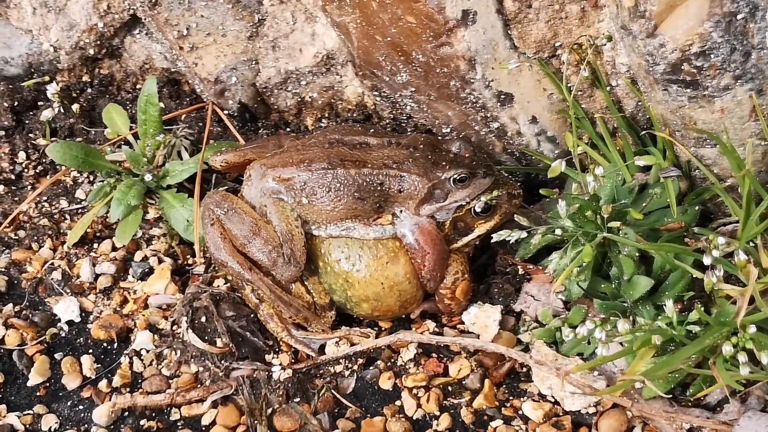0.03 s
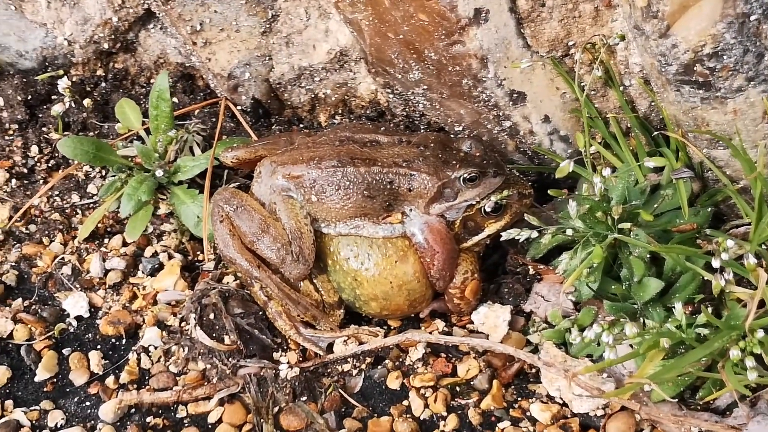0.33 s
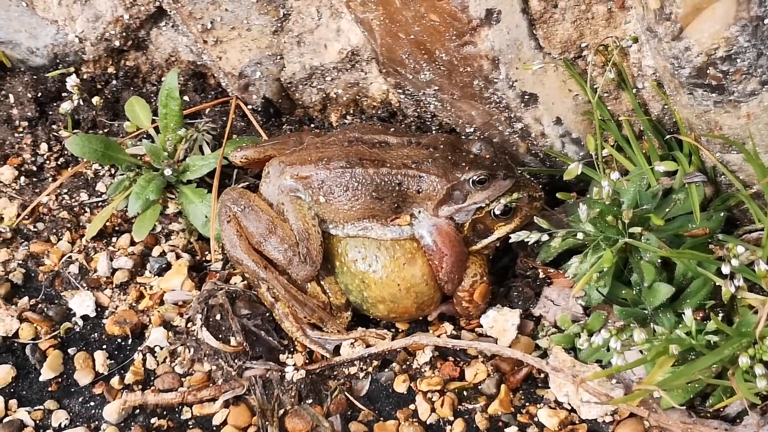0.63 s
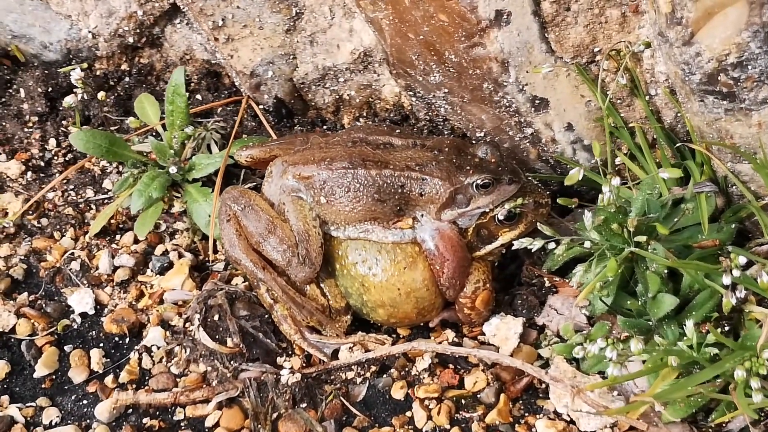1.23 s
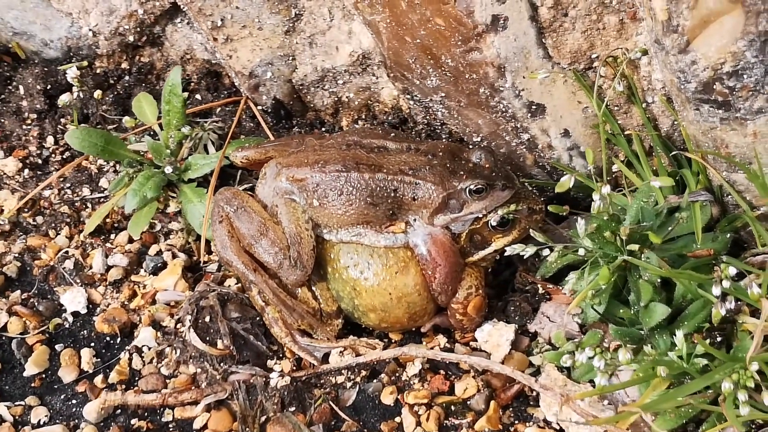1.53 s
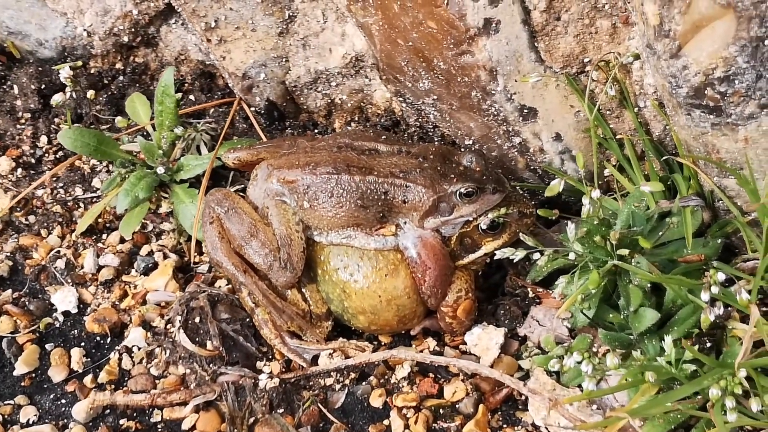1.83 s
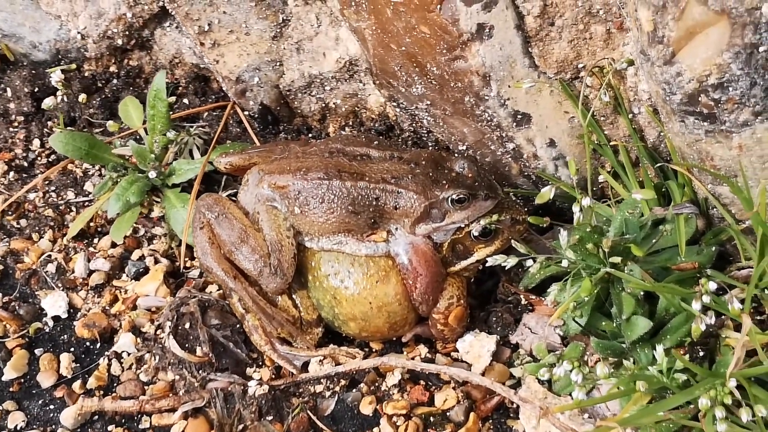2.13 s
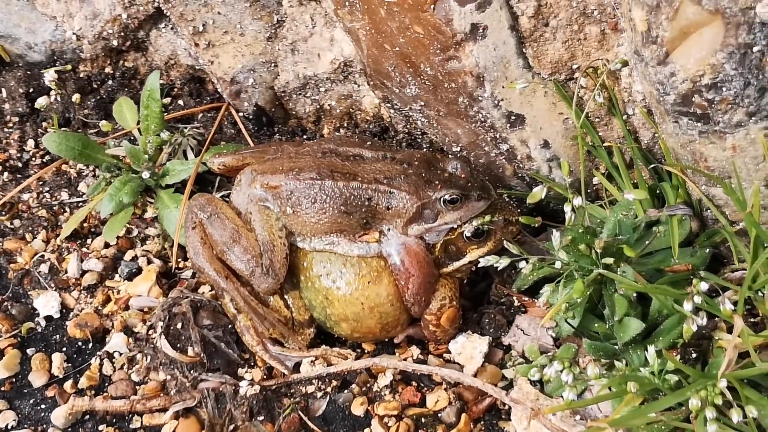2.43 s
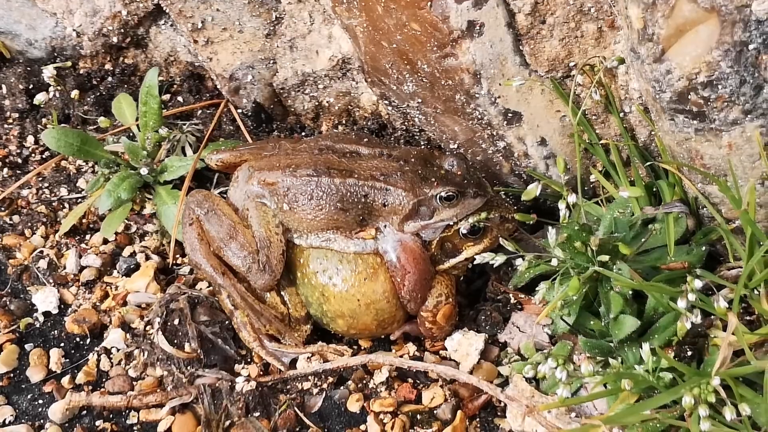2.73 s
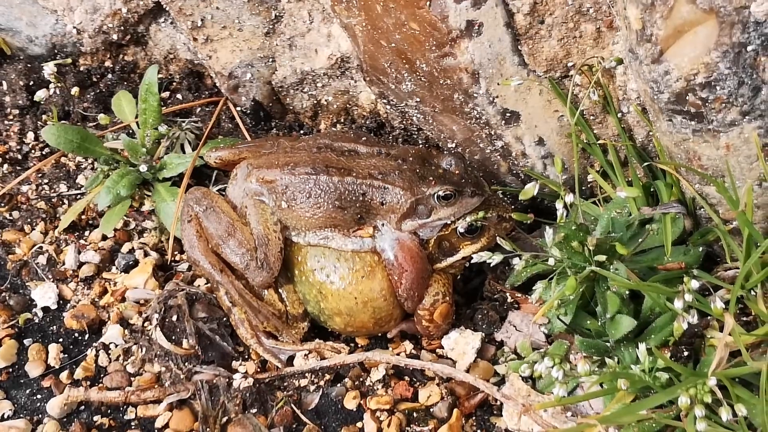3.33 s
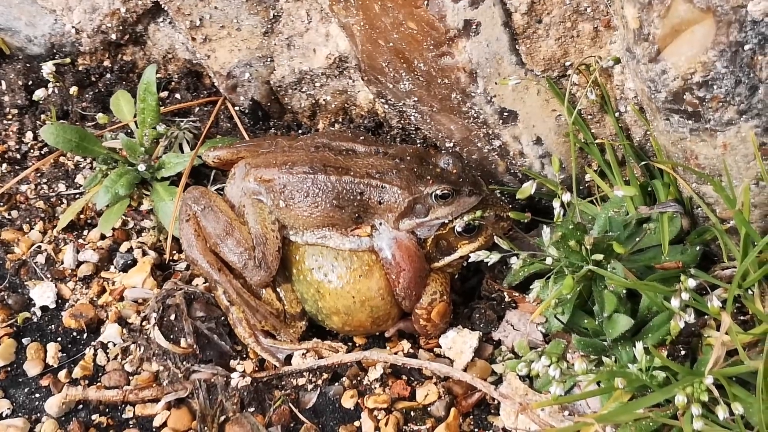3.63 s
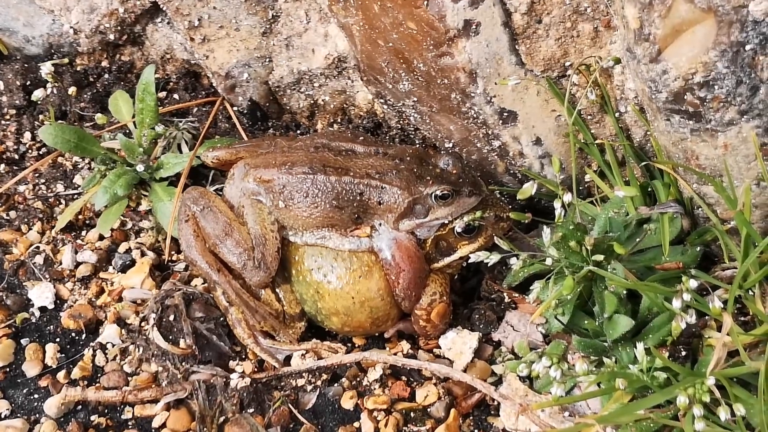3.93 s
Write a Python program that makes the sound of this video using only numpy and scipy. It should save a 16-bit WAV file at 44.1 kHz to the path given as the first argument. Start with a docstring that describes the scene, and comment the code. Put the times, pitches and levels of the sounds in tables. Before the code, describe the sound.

Wind buffets the microphone with low rumbling gusts and dull puffs, strongest around half a second and dying away by 2 seconds. From about 1.5 seconds a distant engine hums, speeding up and easing off over soft road rumble and tyre hiss. A small bird chirps faintly in rapid, hoarse notes until about 3 seconds. Other birds give a few thin whistles near 1 second and towards the end.

```python
"""Wind gusts buffet a microphone in a garden corner: low turbulence and dull eddy puffs.
They die away and uncover the exhaust orders of a far engine that speeds up and eases off,
over the rumble and tyre hiss of a road. A small bird scolds in hoarse, rising notes, a buzz
shaped by its throat; others add a few thin whistles. A wall and leaves reflect the birds."""
import sys
import numpy as np
from scipy import signal
from scipy.io import wavfile

SR = 44100
rng = np.random.default_rng(int(sys.argv[2]) if len(sys.argv) > 2 else 0)


def to_wav(s):
    """Save 16-bit WAV."""
    ch = np.atleast_2d(s).T  # columns
    pcm = np.round(np.clip(ch, -1, 1) * 32767)  # PCM
    wavfile.write(sys.argv[1], SR, pcm.astype(np.int16))


N = 176400
TIME = np.arange(N) / SR
ROAD_LAG_S = 0.0005  # right channel lags: the road lies to the left


def from_db(db):
    """Decibels to gain."""
    return 10 ** (np.asarray(db) / 20)


def unit(x):
    """Scale to rms 1."""
    return x / np.sqrt(np.mean(x ** 2) + 1e-20)


def curve(rows):
    """Value columns of a time table, per sample."""
    times_s, *columns = np.transpose(rows)
    return [np.interp(TIME, times_s, column) for column in columns]


def lookup(points, hz):
    """Read a table on a log-frequency axis."""
    points_hz, values = np.transpose(points)
    return np.interp(np.log(hz), np.log(points_hz), values)


def butter(x, order, hz, kind="low"):
    """Butterworth filter."""
    return signal.sosfilt(signal.butter(order, hz, kind, fs=SR, output="sos"), x)


def wander(rate_hz):
    """Smooth random drift, rms 1."""
    step, run_in = 20, 3000
    pole = np.exp(-2 * np.pi * rate_hz * step / SR)
    white = rng.standard_normal(N // step + run_in + 2)
    slow = signal.lfilter([1], [1, -2 * pole, pole * pole], white)[run_in:]
    return np.interp(np.arange(N) / step, np.arange(len(slow)), unit(slow))


def widen(pair, correlation):
    """Two unrelated signals to stereo of a given correlation."""
    c = np.clip(correlation, -0.98, 0.998)
    return np.sqrt((1 + c) / 2) * pair[0] + np.sqrt((1 - c) / 2) * pair[1] * np.array([[1], [-1]])


def noise_bands(spectrum, correlation, flicker_db, flicker_hz):
    """Third-octave stereo noise as (Hz, band) pairs; the sum has rms 1."""
    edges_hz = 16 * 2 ** np.arange(0, 10.1, 1 / 3)
    white, bands = rng.standard_normal((2, 2, N + SR // 4)), []
    for k, (low, high) in enumerate(zip(edges_hz, edges_hz[1:])):
        hz = np.sqrt(low * high)
        if high > spectrum[0][0] and low < spectrum[-1][0]:
            pair = butter(white[k % 2], 2, [low, high], "band")[:, -N:]
            gain = from_db(lookup(spectrum, hz) + flicker_db * wander(flicker_hz))
            bands.append((hz, widen(pair, lookup(correlation, hz)) * gain))
    total_rms = np.std(sum(band for _, band in bands))
    return [(hz, band / total_rms) for hz, band in bands]


def delayed(x, lag_s):
    """Fractional delay."""
    return np.interp(TIME - lag_s, TIME, x)


def add(out, start_s, sound, pan_db):
    """Mix a sound in; positive pan is left."""
    start = max(int(start_s * SR), 0)
    part = sound[..., :N - start]
    out[:, start:start + part.shape[-1]] += part * from_db([[pan_db / 2], [-pan_db / 2]])


def wind():
    """Turbulence at the microphone ports; stronger gusts reach higher, and their top flutters."""
    # gust envelope: (time [s], relative level [dB])
    gusts = [(0.0, -18), (0.022, -17), (0.056, -28.5), (0.126, -16), (0.146, -24), (0.288, -28.5),
             (0.454, -13.5), (0.492, -20), (0.942, -25.5), (0.988, -36), (1.018, -27.5), (1.466, -23.5),
             (1.496, -26), (1.642, -35.5), (2.0, -44.5), (2.55, -38), (2.7, -54), (3.1, -65), (4.0, -47)]
    # turbulence: (frequency [Hz], relative density [dB])
    spectrum = [(20, -9), (45, 5), (85, 2), (150, -5), (250, -11), (350, -18), (500, -47), (700, -48),
                (1300, -70), (3000, -85.5)]
    # between ports: (frequency [Hz], correlation)
    correlation = [(50, 1), (120, 0.76), (240, 0.13), (450, -1.1), (1000, 0.67)]
    trim_db, strong_gust_db = -1.5, -13
    swing_per_octave, tilt_from_hz = 0.15, 88
    ragged_db_per_octave, ragged_from_hz = 2.5, 215
    gust_db, = curve(gusts)
    ragged = np.minimum(wander(rate_hz=130), 2)
    out = np.zeros((2, N))
    for hz, band in noise_bands(spectrum, correlation, flicker_db=0, flicker_hz=10):
        tilt_db = swing_per_octave * max(np.log2(hz / tilt_from_hz), 0) * (gust_db - strong_gust_db)
        ragged_db = ragged_db_per_octave * ragged * np.clip(np.log2(hz / ragged_from_hz), 0, 2)
        out += band * from_db(trim_db + gust_db + tilt_db + ragged_db)
    return out


def road():
    """Rumble from all round; tyre hiss that reaches the left side first."""
    # envelopes: (time [s], level [dB])
    rumble_level = [(0, -66.5), (1.5, -41.5), (2.3, -38), (2.8, -39), (3.15, -44), (3.65, -40), (4, -43)]
    hiss_level = [(0, -53), (.65, -56), (.95, -49), (1.45, -52.5), (1.9, -50), (2.33, -51.5), (2.41, -48.5),
                  (2.52, -52.5), (2.85, -52), (3.08, -55.5), (4, -55)]
    # spectra: (frequency [Hz], relative density [dB])
    rumble_spectrum = [(20, -6), (55, 1), (90, -6.5), (150, -3), (240, -12), (370, -15.5), (550, -26),
                       (900, -28.5), (2000, -67)]
    hiss_spectrum = [(250, 3.5), (600, 1), (880, 0), (1250, 2), (1600, -4), (2050, -1), (2750, -6.5),
                     (3400, -12.5), (5500, -17.5), (7000, -22), (9000, -29), (15000, -32.5)]
    # between channels: (frequency [Hz], correlation)
    rumble_correlation = [(60, 1), (130, 1), (240, 0.61), (450, -0.22), (800, -0.18)]
    hiss_correlation = [(300, 0.78), (700, 0.89), (1300, 0.43), (2100, 0.5), (3500, 0.029)]
    # hiss balance: (frequency [Hz], pan [dB])
    hiss_pan = [(500, 0.5), (900, -0.5), (1300, -3.5), (2000, -4.5), (3200, 3), (5800, -3), (8000, -1)]
    rumble_bands = noise_bands(rumble_spectrum, rumble_correlation, flicker_db=2.5, flicker_hz=9.5)
    rumble = sum(band for _, band in rumble_bands)
    hiss_bands = noise_bands(hiss_spectrum, hiss_correlation, flicker_db=0.4, flicker_hz=9)
    sides = np.array([[0.5], [-0.5]])
    left, right = sum(band * from_db(lookup(hiss_pan, hz) * sides) for hz, band in hiss_bands)
    hiss = np.array([left, delayed(right, ROAD_LAG_S)])
    return rumble * from_db(curve(rumble_level)[0]) + hiss * from_db(curve(hiss_level)[0])


def scolding():
    """Each note starts hoarse, sweeps up through throat resonances and clears into a bright accent."""
    # notes: (time [s], length [s], relative level [dB], centre [Hz], accent [dB], sweep [share of pitch])
    notes = [(0.0, 0.015, -54, 3600, 4, -0.042), (0.049, 0.053, -56, 3820, 15, 0.063),
             (0.126, 0.067, -53, 4060, 14.5, 0.052), (0.255, 0.061, -50.5, 5060, 12.5, 0.091),
             (0.339, 0.043, -52, 4810, 11, 0.025), (0.404, 0.068, -54, 4140, 5.5, 0.0055),
             (0.491, 0.061, -55, 4910, 3.5, 0.14), (0.667, 0.071, -50.5, 5170, 13.5, -0.04),
             (0.763, 0.058, -54, 4890, 12, -.04), (0.856, 0.047, -51.5, 5080, 14, 0),
             (0.984, 0.058, -49.5, 5180, 11, -0.027), (1.121, 0.069, -51.5, 5160, 18, 0.065),
             (1.244, 0.047, -54.5, 5140, 13, 0.013), (1.328, 0.041, -55.5, 5220, 8, 0.066),
             (1.402, 0.038, -59, 4160, 8, 0.17), (1.474, 0.05, -57.5, 4360, 8, .12),
             (1.557, 0.065, -54.5, 5140, 7.5, 0.29), (1.725, 0.063, -50.5, 5520, 14, 0.074),
             (1.841, 0.055, -53, 5380, 11, 0.049), (1.949, 0.056, -52.5, 5560, 13.5, 0.23),
             (2.061, 0.054, -54, 4750, 12, -0.035), (2.151, 0.043, -56, 4740, 11, -0.011),
             (2.246, 0.051, -55, 4830, 8.5, 0.029), (2.336, 0.04, -56.5, 4870, 9, 0.052),
             (2.423, 0.052, -54, 4830, 10, .12), (2.536, 0.064, -53, 5500, 9, 0.16),
             (2.673, 0.071, -52, 5670, 9, 0.064), (2.812, 0.071, -56.5, 6800, 6, .14),
             (2.885, 0.04, -62, 3896, 8, 0.01)]
    # throat response for a note centred at reference_hz: (frequency [Hz], gain [dB])
    throat = [(2400, -36), (3100, -9), (3650, 3), (4300, -1), (5200, 3.5), (5900, -5), (6900, -6.5),
              (7500, -15.5), (8400, -37.5)]
    # balance of the notes over time: (time [s], pan [dB])
    pan = [(0.3, -1.5), (1.7, 1), (2.0, 3.5), (2.6, 1)]
    trim_db, lead_s, tail_s, attack_s, release_s = -2, 0.006, 0.004, 0.018, 0.016
    reference_hz, reference_buzz_hz, buzz_range_hz = 4960, 631, (500, 933)
    crest_at, accent_width = 0.57, 0.4  # shares of the note
    scoop, jitter_depth, accent_bandwidth = 0.2, 0.014, 0.091  # shares of frequency
    accent_rasp = 0.57
    out, jitter = np.zeros((2, N)), wander(rate_hz=220)
    rasps = [wander(rate_hz=130) + 1j * wander(rate_hz=130) for _ in range(14)]  # one per harmonic
    for time_s, length_s, db, centre_hz, accent_db, sweep in notes:
        span_s = length_s + lead_s + tail_s
        t, start = TIME[:int(span_s * SR)], int(time_s * SR)
        here = slice(start, start + len(t))
        past_crest = t / span_s - crest_at
        accent = np.exp(-(past_crest / accent_width) ** 2)
        rasp_depth = 1 + (accent_rasp - 1) * accent
        # higher notes buzz faster and tighten the throat
        height = centre_hz / reference_hz
        buzz_hz = np.clip(reference_buzz_hz * height ** 2.1, *buzz_range_hz)
        throat_scale = height ** 0.55
        centre_harmonic = np.round(centre_hz / buzz_hz)
        bend = 1 + sweep * past_crest - scoop * (past_crest / crest_at) ** 2
        pitch_hz = centre_hz / centre_harmonic * (bend + jitter_depth * jitter[here])
        phase = 2 * np.pi * np.cumsum(pitch_hz) / SR
        note = 0
        for k, rasp in enumerate(rasps, int(centre_harmonic) // 2):
            boost_db = accent_db * accent * np.exp(-(np.log(k / centre_harmonic) / accent_bandwidth) ** 2)
            roughness = (1 + rasp_depth * rasp[here]) / np.sqrt(1 + 2 * rasp_depth ** 2)
            wave = np.exp(1j * (k * phase + rng.uniform(0, 2 * np.pi))) * roughness
            throat_db = lookup(throat, k * pitch_hz / throat_scale)
            note += from_db(throat_db + boost_db) * widen([wave.real, wave.imag], correlation=0.18)
        envelope = np.minimum(t / attack_s, 1) * np.minimum((span_s - t) / release_s, 1)
        pan_db = np.interp(time_s, *np.transpose(pan))
        add(out, time_s - lead_s, from_db(db + trim_db) * unit(note * envelope), pan_db)
    return out


def buffets():
    """Eddies slap the microphone: a deep push shared by both ports, a flutter opposed in them."""
    # eddies: (time [s], level [dB], reach [Hz], decay [s])
    eddies = [(0.01, -22.5, 250, 0.028), (0.075, -25.5, 380, 0.0053), (0.099, -21, 290, 0.0098),
              (0.305, -17, 442, 0.014), (0.35, -26.5, 310, 0.015), (0.39, -29.5, 420, 0.0067),
              (.403, -18, 270, 0.0074), (0.416, -19, 446, 0.006), (0.44, -15.5, 436, 0.0067),
              (.461, -16.5, 188, 0.013), (0.483, -19.5, 429, 0.0056), (0.52, -19, 367, 0.013),
              (0.576, -27, 400, 0.0027), (0.622, -19.5, 214, 0.02), (0.736, -24, 195, 0.025),
              (0.888, -22.5, 220, 0.0098), (0.925, -16.5, 223, 0.0027), (1.284, -25.5, 210, 0.026),
              (1.351, -23.5, 200, 0.0059), (1.404, -20.5, 257, 0.0076), (1.573, -21.5, 100, 0.013)]
    split_hz, flutter_db = 230, -3
    out, t = np.zeros((2, N)), TIME[:SR // 5]
    for time_s, db, reach_hz, decay_s in eddies:
        deep, upper = rng.standard_normal((2, 2, len(t))) * np.exp(-t / decay_s)
        push = butter(widen(deep, correlation=0.83), 2, split_hz)
        flutter = butter(widen(upper, correlation=-0.68), 2, split_hz, "high")
        puff = butter(push + from_db(flutter_db) * flutter, 3, reach_hz)
        puff = butter(puff, 1, reach_hz / 3, "high")
        add(out, time_s, from_db(db) * unit(puff) * np.sqrt(decay_s / t[-1]), pan_db=1)
    return out


def whistles():
    """Other birds: pure glides, fast at first and then settling, with a slight quiver."""
    # glides: (time [s], length [s], start [Hz], end [Hz], level [dB], pan [dB], settling exponent)
    glides = [(0.8, 0.027, 3670, 2940, -57, -3, 1.4), (0.863, 0.029, 3770, 3030, -56.5, 0, 1.7),
              (0.949, 0.023, 3680, 2940, -57, -1, 1.2), (1.073, .025, 4780, 5430, -63.5, -9, 1.7),
              (2.943, 0.03833, 5100, 5880, -58, -7, 6), (3.47, 0.019, 4930, 5600, -73.5, 0, 1.6),
              (3.564, 0.022, 2910, 4024, -67, 0, 1.27), (3.639, 0.025, 4703, 5590, -65.5, 0, 1.4)]
    out, quiver = np.zeros((2, N)), 1 + 0.007 * wander(rate_hz=300)
    for time_s, length_s, start_hz, end_hz, db, pan_db, settling in glides:
        progress = np.linspace(0, 1, int(length_s * SR))
        hz = end_hz + (start_hz - end_hz) * (1 - progress) ** settling
        hz *= quiver[int(time_s * SR):][:len(hz)]
        envelope = 2 * np.sqrt(2 * progress * (1 - progress))
        add(out, time_s, from_db(db) * envelope * np.sin(2 * np.pi * np.cumsum(hz) / SR), pan_db)
    return out


def engine():
    """A far engine fades in; its low exhaust orders follow its speed and waver in level."""
    # engine run: (time [s], cycle rate [Hz], relative levels of orders 2, 3, 4 [dB])
    run = [(1.6, 33.66, -50, -52, -29.5), (1.8, 36.58, -38, -35.5, -24.5), (2.03, 39.23, -33.5, -48.5, -46),
           (2.08, 38.78, -49, -37.5, -39.5), (2.44, 35.53, -35, -44.5, -33), (2.58, 34, -27.5, -54, -50.5),
           (2.71, 34.1, -28.5, -39, -47), (2.9, 32.5, -37, -53, -54), (3.19, 28.56, -41.5, -48, -52.5),
           (3.63, 27.02, -37, -49, -36), (4.0, 27.5, -40.5, -58, -50)]
    # weak exhaust orders: (multiple of cycle rate, relative level [dB])
    weak_orders = [(1, -46.5), (5, -50.5), (6, -56), (9, -58.5), (10, -58.5), (12, -57)]
    trim_db, enter_s, fade_s = -2.5, 1.51, 0.34
    speed_waver, flutter_db, weak_drift_db = 0.0023, 0.45, 2
    cycle_hz, *strong_db = curve(run)
    phase = 2 * np.pi * np.cumsum(cycle_hz * (1 + speed_waver * wander(rate_hz=5.9))) / SR
    effort_db = 30 * np.log10(cycle_hz / cycle_hz.mean())
    orders = list(enumerate(strong_db, 2))
    orders += [(k, db + effort_db + weak_drift_db * wander(rate_hz=3.1)) for k, db in weak_orders]
    tone = np.zeros(N)
    for k, db in orders:
        gain = from_db(db + trim_db + flutter_db * wander(rate_hz=8.4))
        tone += gain * np.sqrt(2) * np.sin(k * phase + rng.uniform(0, 2 * np.pi))
    tone *= np.clip((TIME - enter_s) / fade_s, 0, 1)
    return np.array([tone, delayed(tone, ROAD_LAG_S)])


def garden(x, scatter_db):
    """Direct sound, one echo off the near wall, and scatter from leaves and fences."""
    t60_s, wall_db, wall_lag_s = 0.79, -12.5, 0.0052
    t = TIME[:SR // 2]
    scatter = rng.standard_normal((2, len(t))) * from_db(-60 * t / t60_s)
    tail = signal.fftconvolve(x, unit(scatter) / np.sqrt(len(t)), axes=1)[:, :N]
    wall = np.array([delayed(x[0], wall_lag_s), delayed(x[1], wall_lag_s + ROAD_LAG_S)])
    return x + from_db(wall_db) * wall + from_db(scatter_db) * tail


def scene():
    """Wind close by, traffic and birds beyond; the whistlers sit farther off than the scolder."""
    return (wind() + buffets() + engine() + road()
            + garden(scolding(), scatter_db=-13) + garden(whistles(), scatter_db=-5))


def record(dry):
    """Steep low-pass, run in on a mirrored lead."""
    stopband_hz = 16956
    lowpass = signal.cheby2(12, 70, stopband_hz, fs=SR, output="sos")
    padded = np.pad(dry, ((0, 0), (SR // 10, 0)), mode="reflect")
    return signal.sosfilt(lowpass, padded)[:, -N:]


dry = scene()
out = record(dry)
to_wav(out)
```